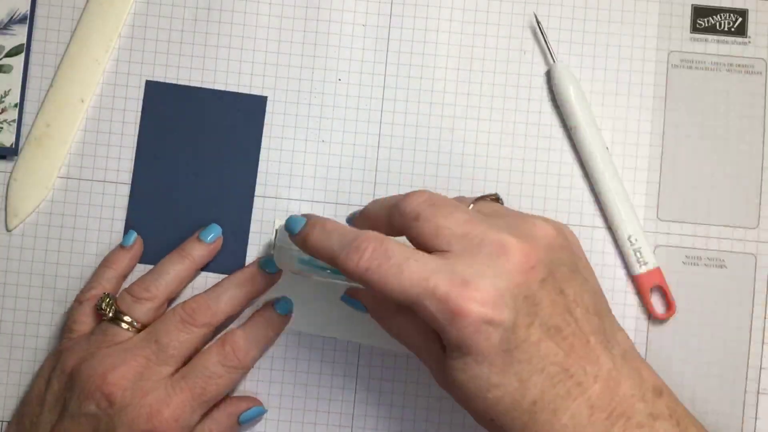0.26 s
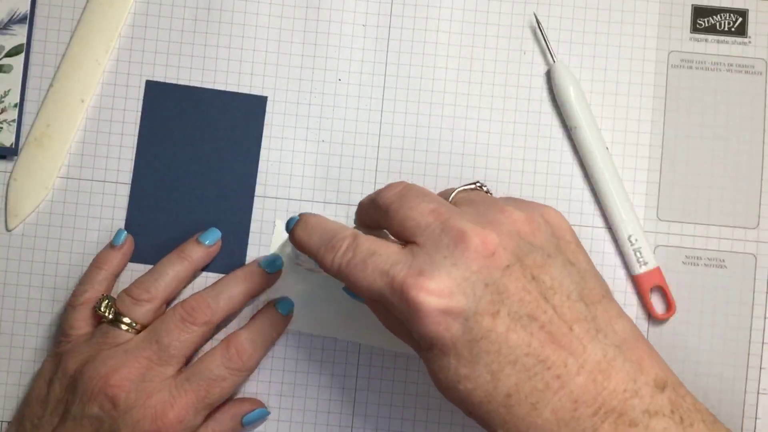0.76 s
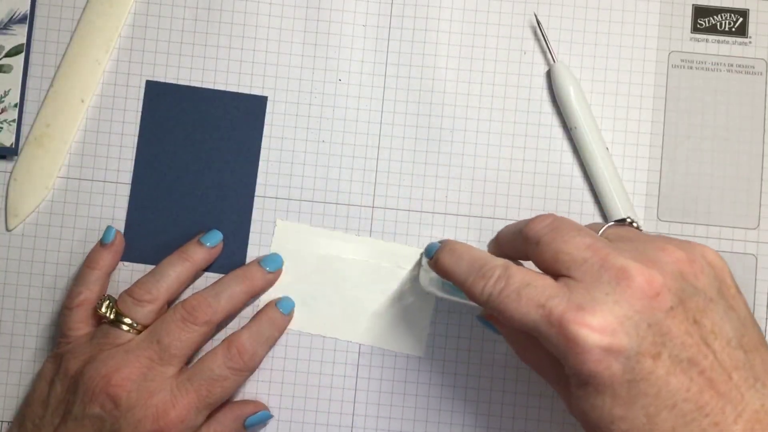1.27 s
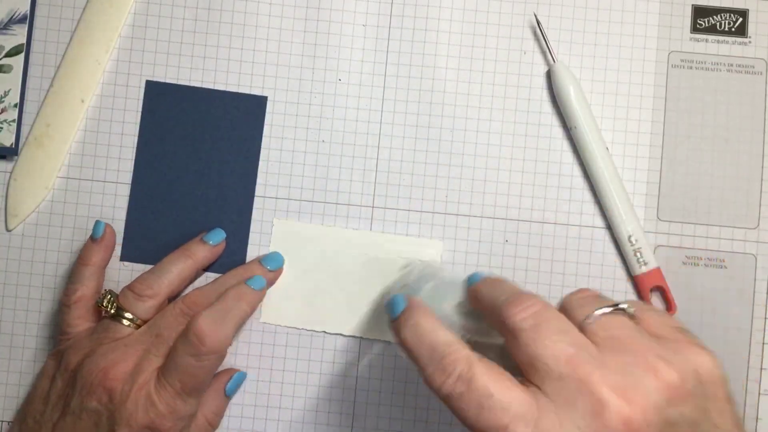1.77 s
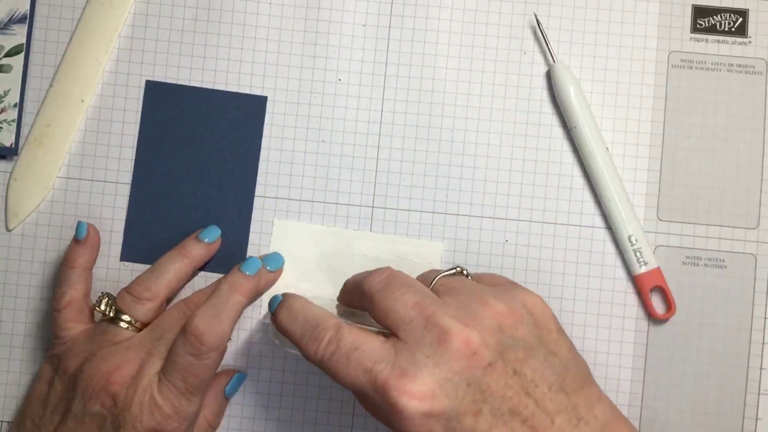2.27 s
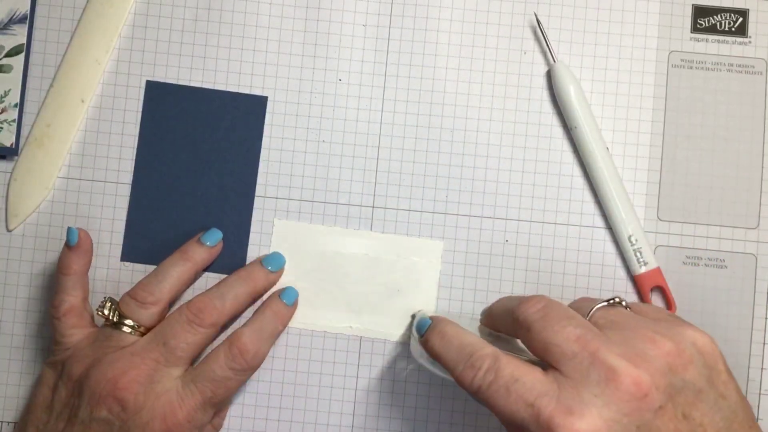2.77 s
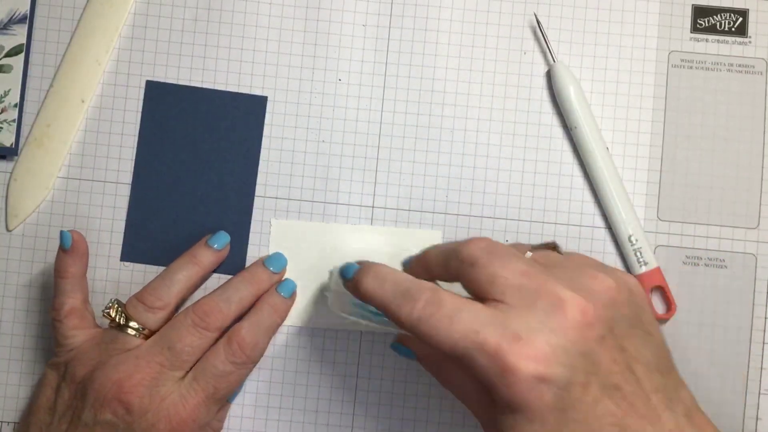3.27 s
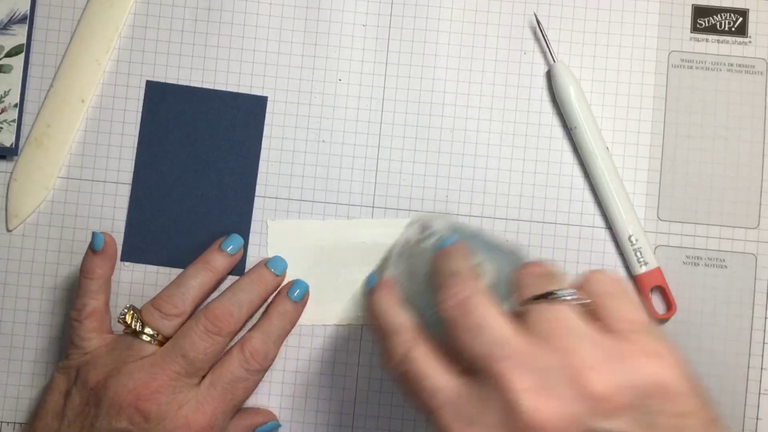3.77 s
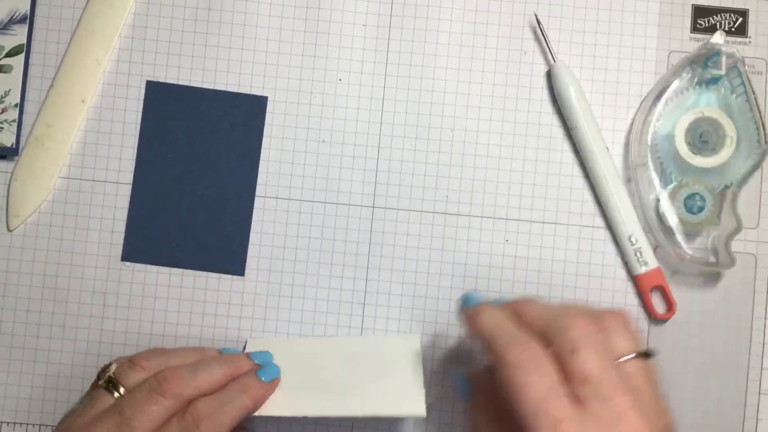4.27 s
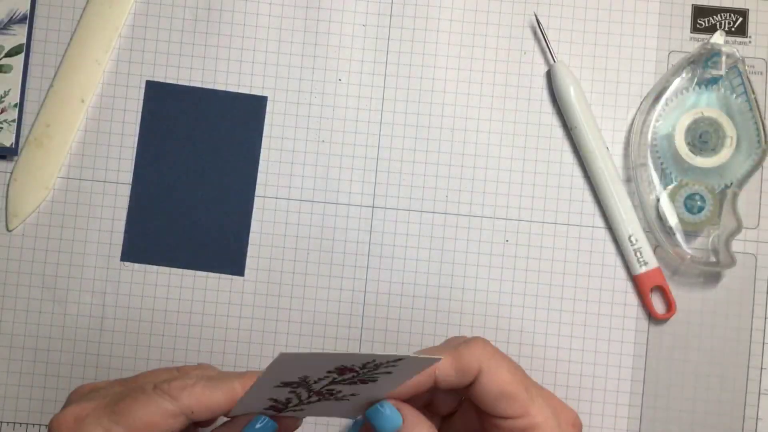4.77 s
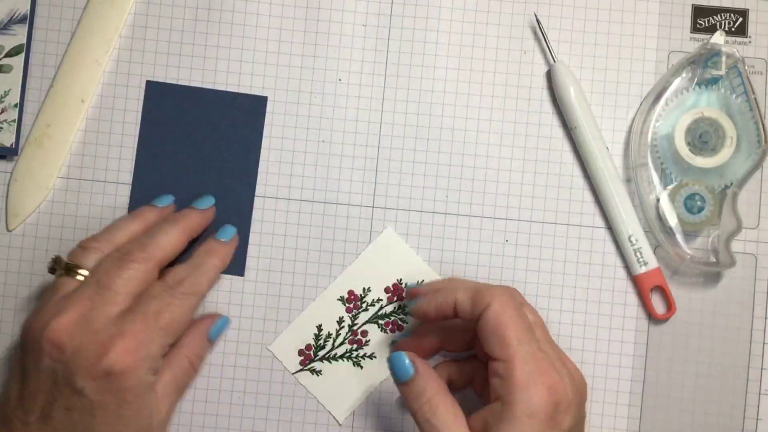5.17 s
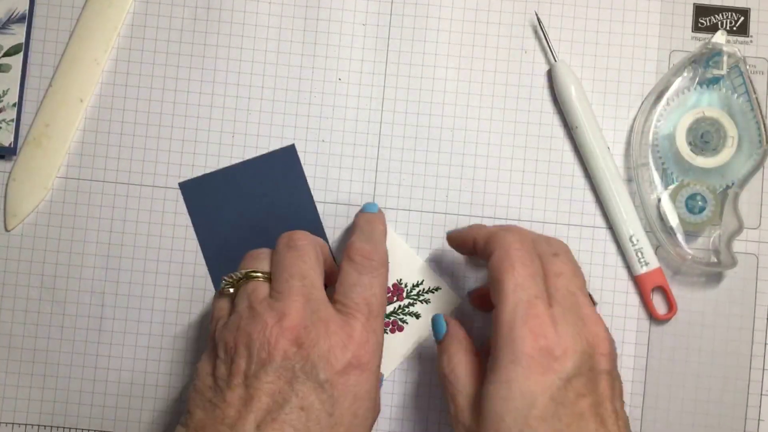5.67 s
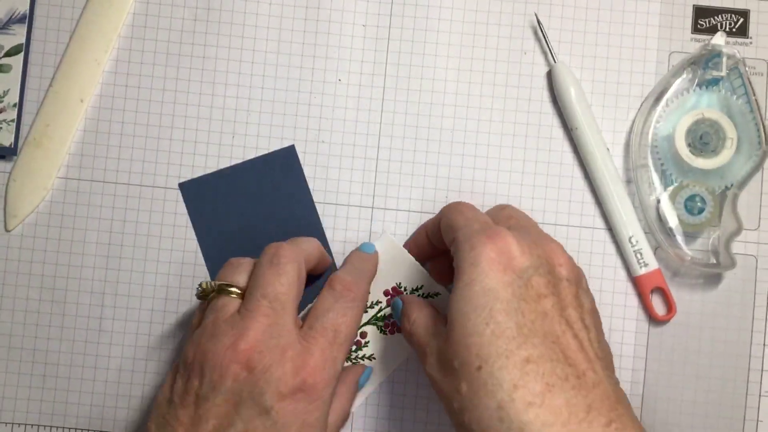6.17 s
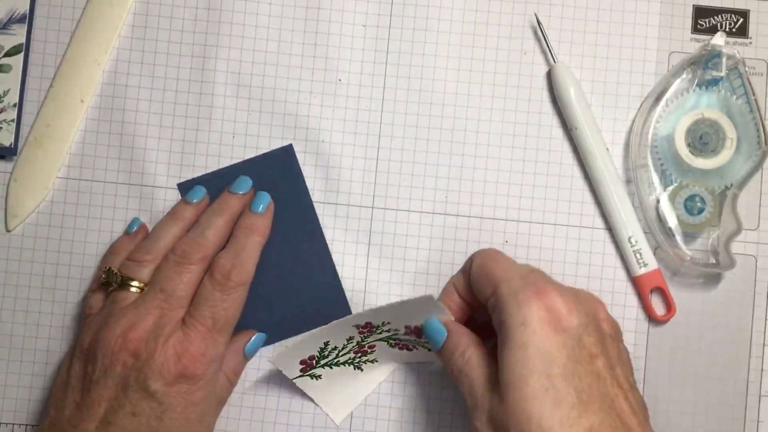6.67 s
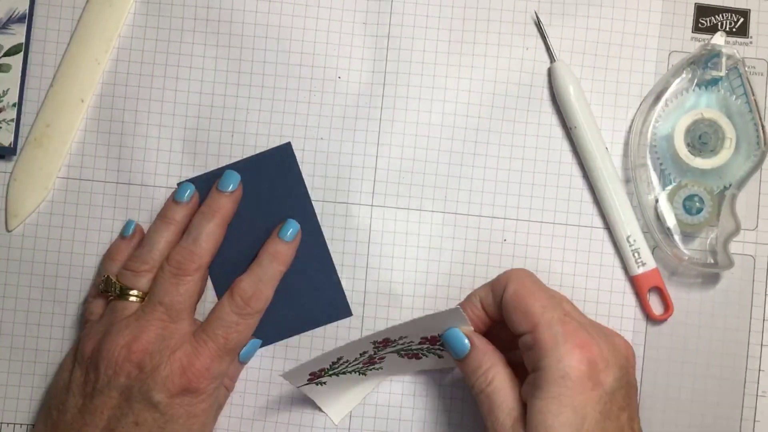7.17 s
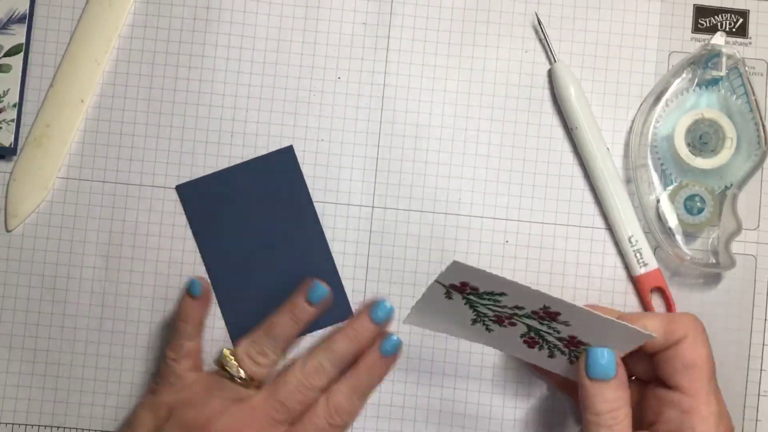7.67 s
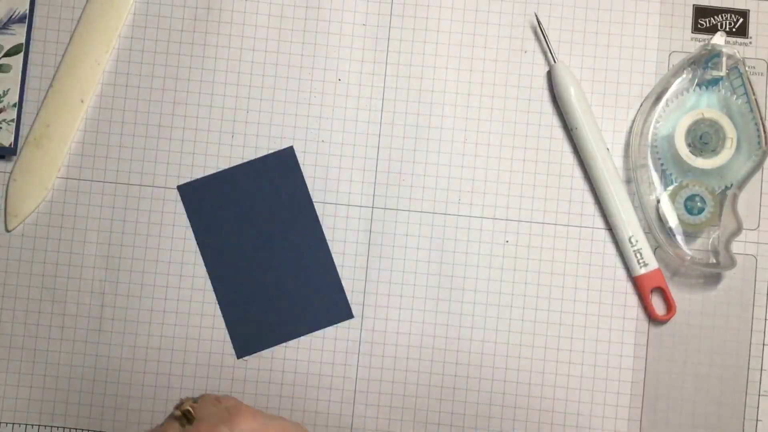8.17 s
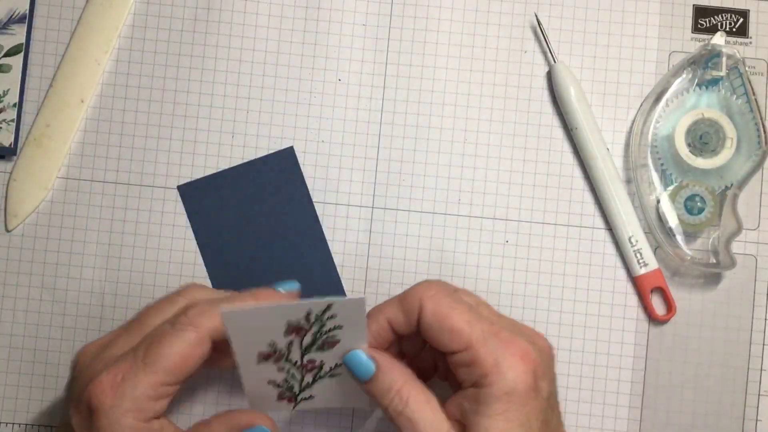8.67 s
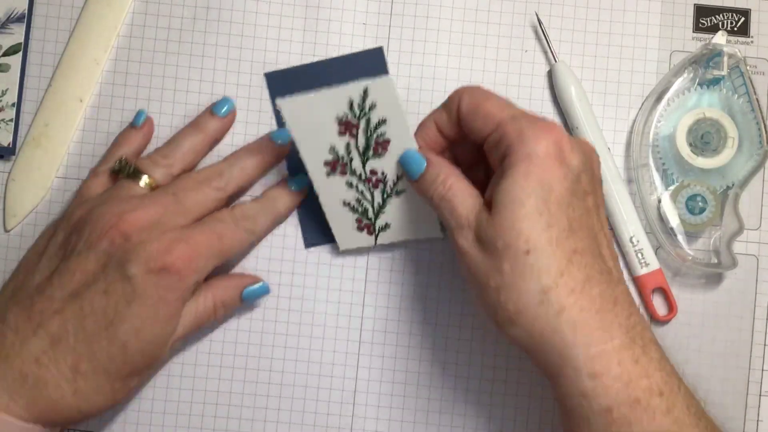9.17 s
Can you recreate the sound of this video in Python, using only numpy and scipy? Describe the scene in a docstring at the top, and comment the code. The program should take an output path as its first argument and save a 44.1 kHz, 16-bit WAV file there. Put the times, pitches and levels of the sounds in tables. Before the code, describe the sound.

Close up at a craft table in a quiet small room, a plastic tape runner is drawn over card with soft rasps, low table rubs and scattered clicks. A fast ratchet burst and clacks follow as it is set aside. Then the card is picked up, brushed and flicked, with crisp snaps, the loudest past the middle, before quieter sliding. A faint engine revs far off behind gentle ventilation.

```python
"""An adhesive tape runner is drawn across card on a craft table and set down; the card is picked up, flicked and slid.
Shell and card: short noise contacts ring resonances, with table thud, treble tick and sizzle, and room echoes.
Roller, fingers and card on paper: random slips drive rasp, table rumble, crackle and hiss under stroke envelopes.
Behind: filtered noise and a thin whine as room tone; gliding near-sines as a short hoot and a far engine."""
import sys
import numpy as np
from scipy import signal
from scipy.fft import rfft, irfft, next_fast_len
from scipy.io import wavfile

SR = 44100
rng = np.random.default_rng(int(sys.argv[2]) if len(sys.argv) > 2 else 0)


def inscribe(sig):
    """Save sig as 16-bit PCM at rate SR to the path in sys.argv[1].

    A 1-D sig is mono; a 2-D sig holds one channel per row.
    Samples are clipped to [-1, 1] before scaling.
    """
    pcm = np.round(np.clip(np.atleast_2d(sig).T, -1, 1) * 32767)
    wavfile.write(sys.argv[1], SR, pcm.astype(np.int16))


N = 416304


def from_db(db):
    """Amplitude factor of a level in dB."""
    return 10 ** (np.asarray(db) / 20)


def rms_one(x):
    """Scales to RMS 1."""
    return x / np.sqrt(np.mean(x ** 2) + 1e-20)


def peak_one(x):
    """Scales to peak 1."""
    return x / np.max(np.abs(x))


def in_time(rows):
    """Columns of a curve, one value per sample."""
    s, *columns = np.transpose(rows)
    return [np.interp(np.arange(N) / SR, s, c) for c in columns]


def coloured(x, spectrum):
    """Gives x a smooth spectrum of (frequency [Hz], gain [dB]) points."""
    hz, gain_db = np.transpose(spectrum)
    size = next_fast_len(len(x))
    log_hz = np.log(np.arange(size // 2 + 1) * SR / size + 1)
    gain = from_db(np.interp(log_hz, np.log(hz), gain_db))
    return irfft(rfft(x, size) * gain, size)[:len(x)]


def high_pass(x, hz):
    """Fourth-order high-pass."""
    return signal.sosfilt(signal.butter(4, hz, "high", fs=SR, output="sos"), x)


def low_pass(x, hz, order):
    """Butterworth low-pass."""
    return signal.sosfilt(signal.butter(order, hz, fs=SR, output="sos"), x)


def drift(rate_hz):
    """Slow random wander of RMS 1: noise through a double pole."""
    r = np.exp(-2 * np.pi * rate_hz / SR)
    noise = rng.standard_normal(N + SR)
    return rms_one(signal.lfilter([1], [1, -2 * r, r * r], noise)[SR:])


def resonate(x, hz, width_hz):
    """A resonance with gain 1 on top."""
    r = np.exp(-np.pi * width_hz / SR)
    poles = [1, -2 * r * np.cos(2 * np.pi * hz / SR), r * r]
    return signal.lfilter([(1 - r * r) / 2, 0, (r * r - 1) / 2], poles, x)


def body(x, modes, extra_db=0):
    """Resonances in parallel, signs alternating."""
    gains = from_db(np.array(modes)[:, 2] + extra_db) * (-1) ** np.arange(len(modes))
    return sum(g * resonate(x, hz, width_hz) for g, (hz, width_hz, db) in zip(gains, modes))


def glide(rows, second_db):
    """A near-sine on a pitch curve plus its faint octave, faded in and out at the curve's ends."""
    hz, level_db = in_time(rows)
    s = np.arange(N) / SR
    fade_in = np.clip((s - rows[0][0]) / 0.04, 0, 1)
    fade_out = np.clip((rows[-1][0] - s) / 0.025 + 1, 0, 1)
    phase = 2 * np.pi * np.cumsum(hz) / SR
    tone = np.sin(phase) + from_db(second_db) * np.sin(2 * phase)
    return np.sqrt(2) * fade_in * fade_out * from_db(level_db) * tone


# ventilation spectrum: (frequency [Hz], gain [dB])
AIR_SPECTRUM = [(18, -74), (30, -34.5), (157, -1.5), (194, 5), (404, -15), (569, -16.5), (1070, -16),
                (1350, -12.5), (1500, -15.5), (2750, -21), (4910, -35), (6550, -47), (7670, -52),
                (13300, -49), (16000, -33.5)]
AIR_RMS_DB, WHINE_HZ, WHINE_DB = -61, 1372, -76  # whine: centre pitch and level


def room_tone():
    """Soft ventilation noise with a lumpy bass, and a thin sine whine wandering in pitch and level."""
    air = rng.standard_normal(N) * from_db(1.0 * drift(6.5))
    air = rms_one(coloured(air, AIR_SPECTRUM))
    whine_hz = WHINE_HZ + 2 * drift(3)
    whine = np.sqrt(2) * np.sin(2 * np.pi * np.cumsum(whine_hz) / SR) * from_db(3 * drift(2))
    return from_db(AIR_RMS_DB) * air + from_db(WHINE_DB) * whine


# strokes of roller, fingers and card on paper: (strongest time [s], swell [s], fade [s], rasp level [dB],
# table rumble level [dB], rumble pitch [Hz], fine hiss level [dB], rasp pitch [Hz])
STROKE_ROWS = [(.05, .2, 0.18, -64, -70, 382, -78, 2670), (.33, 0.23, 0.18, -56.5, -54.5, 435, -62.5, 2430),
               (.53, 0.16, 0.08, -64.5, -59, 365, -75, 2390),
               (.775, 0.022, 0.18, -55, -51.5, 524, -72, 1890), (.87, 0.12, 0.16, -58, -52, 460, -75, 3750),
               (1.3, 0.42, 0.35, -63.5, -65, 556, -66, 2070), (1.84, .08, .12, -59, -62.5, 626, -71, 3000),
               (1.95, 0.072, 0.032, -56, -73, 623, -63, 3400),
               (2.4, 0.012, 0.04, -62, -47.5, 490, -67, 2200),
               (2.49, 0.028, 0.055, -52.5, -49, 400, -78, 3680), (2.7, 0.2, 0.18, -61, -59, 550, -64, 2220),
               (2.83, .15, 0.15, -57, -59, 570, -59, 2100), (3.2, 0.15, 0.04, -61.5, -64, 583, -78, 2880),
               (3.32, 0.032, 0.044, -55, -56, 714, -51.5, 2600),
               (3.71, .06, 0.17, -52, -64, 483, -58.5, 3160),
               (3.83, 0.062, 0.051, -65, -58.5, 566, -65, 2900),
               (4.05, 0.11, 0.15, -63.5, -60.5, 644, -62, 3200),
               (4.28, 0.11, 0.24, -58.5, -77, 420, -65.5, 3350),
               (4.41, 0.11, 0.093, -61.5, -61, 620, -65, 2300),
               (4.6, 0.023, 0.13, -59, -60, 700, -63, 2900),
               (4.73, 0.1, 0.089, -49.5, -46.5, 895, -59.5, 2410),
               (4.85, 0.18, 0.48, -60, -61, 340, -74, 2750),
               (5.23, 0.043, 0.038, -56.5, -57.5, 705, -55.5, 3130),
               (5.592, .1, 0.15, -58.5, -64.5, 1040, -54, 3730),
               (5.869, 0.13, 0.11, -58.5, -55.5, 980, -57.5, 3330),
               (6.039, 0.077, 0.092, -73, -46, 725, -72, 2000),
               (6.13, 0.059, .04, -62.5, -51, 605, -68.5, 2200),
               (6.5, 0.13, 0.11, -56.5, -62, 706, -61, 3400), (6.63, .04, 0.044, -59, -65, 450, -74, 3400),
               (6.71, 0.099, 0.12, -60, -64, 480, -57.5, 3300),
               (6.85, 0.11, 0.35, -55, -61.5, 690, -59.5, 3120),
               (7.13, 0.11, 0.14, -58.5, -65, 750, -60, 3200), (7.39, 0.12, 0.22, -57, -63, 690, -57, 2600),
               (7.61, 0.21, 0.11, -49.5, -70, 800, -52, 2850),
               (7.88, 0.033, 0.059, -51.5, -70, 781, -59, 2500),
               (7.935, 0.04, .05, -54.5, -56.5, 740, -59, 2380),
               (8.13, 0.35, .08, -59.5, -71, 850, -53.5, 4000),
               (8.44, 0.026, 0.036, -58, -57, 750, -61.5, 2600),
               (8.52, .025, 0.028, -47.5, -49.5, 738, -50.5, 2400),
               (8.62, 0.09, 0.036, -60.5, -63.5, 420, -66, 3230),
               (8.83, 0.18, 0.28, -66.5, -70, 710, -70.5, 2280),
               (9.41, 0.24, 0.23, -57, -66, 1007, -51, 3600)]
# hands resting on the paper: (rasp level [dB], rumble level [dB], rumble pitch [Hz], hiss level [dB],
# rasp pitch [Hz])
RESTING_HANDS = (-69.5, -76.5, 548, -74.5, 2692)
STROKE_EDGE_DB, STROKE_ROUNDNESS = 15.5, 1.63  # drop one swell or fade away; 1 pointed, 2 rounded


def strokes():
    """Each stroke swells and fades by one rule; powers add, and power-weighted means set the pitches."""
    s = np.arange(0, N + 64, 64) / SR
    at_s, swell_s, fade_s, *columns = np.transpose(STROKE_ROWS)[:, :, None]
    away = np.where(s < at_s, (at_s - s) / swell_s, (s - at_s) / fade_s)
    power_shape = from_db(-2 * STROKE_EDGE_DB * np.minimum(away, 9) ** STROKE_ROUNDNESS)
    shapes = np.vstack([power_shape, np.ones_like(s)])  # resting hands never fade
    columns = [np.append(c, r)[:, None] for c, r in zip(columns, RESTING_HANDS)]
    rasp_db, rumble_db, rumble_hz, hiss_db, rasp_hz = columns
    rasp, rumble, hiss = [shapes * from_db(2 * db) for db in (rasp_db, rumble_db, hiss_db)]
    pitches = [(p * hz).sum(0) / p.sum(0) for p, hz in ((rasp, rasp_hz), (rumble, rumble_hz))]
    gains = [np.sqrt(p.sum(0)) for p in (rasp, rumble, hiss)]
    return [np.interp(np.arange(N) / SR, s, c) for c in gains + pitches]


def grains(per_s, spread_db):
    """Fibres catch and slip at random, with uneven strength and either sign."""
    sizes = from_db(spread_db * np.minimum(rng.exponential(1, N), 5)) * rng.choice([-1, 1], N)
    return sizes * (rng.random(N) < per_s / SR)


# table top under the mat: (frequency [Hz], width [Hz], gain [dB])
TABLE_MODES = [(340, 84, 10.5), (437.6, 110, 2.5), (553, 110, 2.5), (685, 195, -1.5), (925, 330, -4.5)]


def table_rumble(catches, pitch_hz):
    """Slips shake the table top; the place pressed favours the modes near one pitch."""
    bumps = (catches + 0.31 * rng.standard_normal(N)) * from_db(2.5 * drift(30))
    rumble, power = 0, 0
    for hz, width_hz, db in TABLE_MODES:
        gain = from_db(db - 19.4 * np.abs(np.log2(hz / pitch_hz)))
        rumble = rumble + gain * rms_one(resonate(resonate(bumps, hz, 4.8 * width_hz), hz, width_hz))
        power = power + gain ** 2
    return rumble / np.sqrt(power)


RASP_FOCUS_DB_PER_OCTAVE = 8


def rasping(slips, modes, pitch_hz):
    """Parallel modes, those near the stroke's pitch favoured, at an even level."""
    rings, power = 0, 0
    for k, (hz, width_hz, db) in enumerate(modes):
        gain = from_db(db - RASP_FOCUS_DB_PER_OCTAVE * np.abs(np.log2(hz / pitch_hz)))
        rings = rings + gain * (-1) ** k * resonate(slips, hz, width_hz)
        power = power + gain ** 2 * width_hz
    return rms_one(rings / np.sqrt(power))


# roller on card: (frequency [Hz], width [Hz], gain [dB])
ROLLER_MODES = [(1880, 350, 3.5), (2680, 630, 4), (3370, 1660, 1), (6040, 2400, -9.5)]
# card on mat and fingers: (frequency [Hz], width [Hz], gain [dB])
PAPER_MODES = [(1980, 890, 1), (2730, 440, 5), (3260, 650, 3.5), (4220, 1100, -1.5), (5700, 850, -5.5)]
RUNNER_DOWN_S, RASP_TOP_HZ = 4.15, 7000
CRACKLES_PER_S, CRACKLE_DB = 130, -7  # level re rasp


def paper_rasp(catches, pitch_hz):
    """Slips ring the runner's shell until it is laid aside, then card; adhesive and fibres let go in crackles."""
    slips = catches + 0.5 * rng.standard_normal(N)
    runner_in_hand = np.arange(N) < RUNNER_DOWN_S * SR
    rasp = np.where(runner_in_hand, rasping(slips, ROLLER_MODES, pitch_hz), rasping(slips, PAPER_MODES, pitch_hz))
    rasp = low_pass(high_pass(rasp, 1100), RASP_TOP_HZ, order=2)
    crackle = body(grains(CRACKLES_PER_S, spread_db=1.5) + 1e-18, PAPER_MODES)
    return rms_one(rasp) + from_db(CRACKLE_DB) * rms_one(high_pass(crackle, 1200))


# air at the contact: (frequency [Hz], gain [dB])
HISS_SPECTRUM = [(4500, 5), (6400, 2.5), (7600, -3.5), (9000, -4), (11000, -7.5), (13500, -5), (15800, -8)]


def fine_hiss(catches):
    """The finest slips shake the air at the contact."""
    hiss = coloured(catches + 0.63 * rng.standard_normal(N), HISS_SPECTRUM)
    return rms_one(high_pass(hiss, 5100))


def rubbing():
    """One uneven stream of slips drives table top, card and air."""
    rasp_gain, rumble_gain, hiss_gain, rasp_hz, rumble_hz = strokes()
    catches = grains(1800 * from_db(4 * drift(40)), spread_db=3.3) * from_db(2.5 * drift(60))
    rumble = rumble_gain * table_rumble(catches, rumble_hz)
    rasp = rasp_gain * paper_rasp(catches, rasp_hz)
    return rumble + rasp + hiss_gain * fine_hiss(catches)


# hoot: (time [s], pitch [Hz], level [dB])
HOOT_CURVE = [(0.21, 456, -53), (0.292, 448, -56.5), (0.32, 481, -54), (0.344, 442, -55), (0.4, 483, -65)]


def hoot():
    """A short hollow near-sine as the runner comes down."""
    return glide(HOOT_CURVE, second_db=-30)


# treble resonances of a tick: (frequency [Hz], width [Hz], gain [dB])
TICK_MODES = [(6540, 780, 3.5), (7250, 780, -6), (8330, 210, -4.5)]
TABLE_HZ = 207.5  # deepest mode of the table top
IMPACT, IMPACT_S = 6, 0.0007  # first hard touch: strength re the crackle, delay


def clicks(events, modes, snap_t60_s, contact_t60_s, thud_width_hz, focus_db, spread_db):
    """A brief crackling contact rings the object, thuds on the table, ticks and sizzles in the treble."""
    size = 4096
    out = np.zeros(N + size)
    s = np.arange(size) / SR
    # sharp snap plus a weaker, longer crackle
    decay = from_db(-60 * s / snap_t60_s) + 0.23 * from_db(-60 * s / contact_t60_s)
    shape = (1 - np.exp(-s / 0.00041)) * decay
    impact = IMPACT * (np.arange(size) == round(IMPACT_S * SR))
    mode_hz = np.array(modes)[:, 0]
    for at_s, peak_db, bright_hz, thud_db, thud_hz, tick_db, sizzle_db in events:
        contact = rng.standard_normal(size) * shape + impact + 1e-18
        # the place struck favours modes near one pitch [dB per octave]
        focus = -focus_db * np.abs(np.log2(mode_hz / bright_hz))
        strength_db = spread_db * rng.standard_normal(len(modes)) + focus
        # a small, light object radiates no bass of its own
        ring = high_pass(body(contact, modes, strength_db), 985)
        crack = resonate(contact, bright_hz, 2500)
        struck = peak_one(ring) + 0.29 * peak_one(crack)
        thud = resonate(resonate(contact, thud_hz, 4.9 * thud_width_hz), thud_hz, thud_width_hz)
        deep = resonate(resonate(contact, TABLE_HZ, 140), TABLE_HZ, 130)
        thud = peak_one(thud) + 0.29 * peak_one(deep)
        tick = high_pass(body(contact, TICK_MODES), 6030)
        sizzle = high_pass(contact, 6970)
        at = round(at_s * SR)
        for part, db in ((struck, 0), (thud, thud_db), (tick, tick_db), (sizzle, sizzle_db)):
            out[at:at + size] += from_db(peak_db + db) * peak_one(part)
    return out[:N]


# ratchet runs in the tape spool: (first time [s], teeth [count], gap [s], peak level [dB], brightest [Hz])
RATCHET_RUNS = [(3.715, 5, 0.01, -35, 3580), (3.8048, 2, 0.012, -39, 2830), (3.9386, 2, .008, -44.5, 4010),
                (3.9647, 3, 0.015, -40, 2120)]
# each tooth: (thud re peak [dB], thud pitch [Hz], tick re peak [dB], sizzle re peak [dB])
TOOTH_PARTS = (-18.5, 522, -24, -26)


def teeth():
    """Evenly spaced ratchet teeth, one click row each."""
    return [(s + k * gap_s, db, hz, *TOOTH_PARTS)
            for s, count, gap_s, db, hz in RATCHET_RUNS for k in range(round(count))]


# clicks of the runner shell: (time [s], peak level [dB], brightest [Hz], thud re peak [dB], thud pitch [Hz],
# tick re peak [dB], sizzle re peak [dB])
RUNNER_CLICKS = [(0.2975, -27.5, 2080, -3, 1070, -38, -26), (0.7462, -37, 1900, -6, 533, 1.5, -24),
                 (0.7699, -31.5, 2700, -6.5, 524, -9, -31), (0.8689, -41, 3300, -10, 525, -7, -10),
                 (0.8954, -20, 1640, -5, 490, -14, -9), (1.0023, -31.5, 1970, -14, 940, -10, 7.5),
                 (1.7594, -36.5, 3980, -41, 1280, -12, -20), (1.8295, -32, 3430, -15, 1320, -23, -33),
                 (1.8497, -33.5, 1850, -17, 520, -16, -35), (1.938, -37, 3700, -33, 1170, -18, -31),
                 (2.0029, -43.5, 2990, -30, 1260, 6.5, 12), (2.0974, -46, 4100, -25, 371, -17, 14.5),
                 (2.388, -41.5, 3060, -2.5, 460, -5, -27), (2.4743, -31, 3430, -15, 525, -35, -25),
                 (2.5244, -45.5, 2610, 2, 556, -12, -19), (2.5506, -35, 3370, -23, 360, -15, -7),
                 (2.5648, -51, 3450, -16, 498, -6, 20), (2.668, -51, 3000, -7, 550, 0, 13),
                 (2.6978, -47.5, 2130, 8, 570, -7, -20), (2.835, -37.5, 2180, -3.5, 585, -1, -2),
                 (2.9297, -43.5, 1980, -24, 1230, -15, 15), (3.2505, -35.5, 3700, -12.5, 590, -12, -31),
                 (3.271, -37.5, 1830, -7.5, 1250, -14, -24), (3.3112, -40.5, 3850, -27, 507, 1, -17),
                 (3.6422, -27, 4140, -10, 660, -0.5, -22), (3.6616, -22.5, 3230, -13, 518, -7.5, -28),
                 (4.0218, -36, 3990, -22, 1270, -10, -18), (4.0411, -21.5, 3730, -25, 1260, -31, -39),
                 (4.0616, -43.5, 3240, -9, 840, 7.5, -8), (4.0823, -40.5, 2160, -5.5, 530, -11, -28)]
# plastic shell: (frequency [Hz], width [Hz], gain [dB])
SHELL_RESONANCES = [(1360, 830, -8), (1980, 125, 3), (2180, 150, -1.5), (2670, 410, -4), (3370, 670, 0.5),
                    (3700, 480, 4), (4300, 780, -5)]


def runner_shell():
    """The plastic shell rattles and its spool ratchet clicks."""
    return clicks(RUNNER_CLICKS + teeth(), SHELL_RESONANCES, snap_t60_s=0.019, contact_t60_s=0.022,
                  thud_width_hz=84, focus_db=6.5, spread_db=2.0)


ROOM_T60_S, ROOM_DB, WALL_CUT_HZ, ECHO_RISE_S = 0.094, -12, 2200, 0.0064


def room(x):
    """Dense echoes from cluttered table and walls: a dull part dies first, a bright part lasts longer."""
    s = np.arange(SR // 2) / SR
    bright, dull = rng.standard_normal((2, len(s)))
    dull = rms_one(low_pass(dull, WALL_CUT_HZ, order=1))
    bright_tail = 1.16 * bright * from_db(-60 * s / (1.9 * ROOM_T60_S))
    dull_tail = dull * from_db(-60 * s / ROOM_T60_S)
    echoes = (bright_tail + dull_tail) * np.clip(s / ECHO_RISE_S, 0, 1)
    return signal.fftconvolve(x, echoes / np.sqrt(np.sum(echoes ** 2)))[:N]


# snaps of the card: (time [s], peak level [dB], brightest [Hz], thud re peak [dB], thud pitch [Hz],
# tick re peak [dB], sizzle re peak [dB])
CARD_SNAPS = [(4.346, -22.5, 3170, -3, 1104, -11, -24), (4.4403, -39, 2280, -24, 557, -2.5, -34),
              (4.565, -38, 3100, -13.5, 557, -4, -30), (4.6325, -27, 2770, -17, 1240, -22, -21),
              (4.6533, -22, 2780, -14.5, 760, -15, -19), (4.6643, -21.5, 2830, -13, 780, -10, -31),
              (4.7132, -26, 2490, -17, 1140, -14, -2), (4.7299, -28, 2960, -3, 1030, -17, 2),
              (5.015, -42, 3500, -10.5, 800, -7, -10), (5.22, -31.5, 2670, -16, 830, -6, 0),
              (5.243, -36, 4200, -17, 800, -13, -12), (5.3462, -21.5, 1980, -3.5, 647, -5.5, 5),
              (6.1304, -52.5, 1730, 10.5, 663, -23, -27), (6.395, -45, 3400, -6, 700, -9, -8),
              (6.4592, -39.5, 3300, -28, 619, -5.5, -22), (6.5101, -37.5, 3300, -36, 600, -19, -24),
              (6.5435, -30.5, 3290, -16.5, 703, -31, -30), (6.663, -30, 3080, -16, 778, -2, 9),
              (6.7161, -33, 3380, -30, 431, -13, -25), (6.8448, -37, 3010, -34, 794, -17, -1),
              (6.9172, -13, 3730, -21.5, 910, -33, -42), (7.1167, -33, 3500, -27, 676, -15, -12),
              (7.1312, -25.5, 3600, -25, 557, -21, -2), (7.3921, -32, 2370, -7, 1210, -5.5, -14),
              (7.4255, -13, 2650, -25, 1290, -17, -46), (7.4354, -36.5, 2584, 0.5, 660, -23, -38),
              (7.4634, -29, 2760, -12, 1290, -27, -26), (7.5383, -36, 4100, -28, 633, -28, 6),
              (7.5879, -25, 3477, -34, 960, -24, -5), (7.5926, -6, 3230, -33, 650, -8, 2),
              (7.6075, -19, 4480, -10.5, 1050, -23, -49.5), (8.422, -39.5, 3880, -9.5, 846, -11, -28),
              (8.5052, -32, 3000, -20, 650, -7, 4), (8.5144, -30, 4040, -13, 685, -18, -24),
              (8.525, -31, 2030, -11.5, 970, -18, -44), (8.59, -40, 3300, -16, 900, -18, -20),
              (8.7505, -43.5, 3440, 6, 1043, -16, -19), (8.953, -50, 4000, -15, 600, -4, 5),
              (9.135, -49, 3980, -14, 600, -6, -7)]
# card sheet: (frequency [Hz], width [Hz], gain [dB])
CARD_RESONANCES = [(1150, 620, -9.5), (1794, 324, 3), (1865, 850, -0.5), (2600, 460, 1.5), (2760, 730, 2),
                   (3650, 690, -3.5), (4460, 650, -1.5), (4630, 1740, -5), (5930, 810, -6.5)]


def card_snaps():
    """The flicked card snaps, ringing broad sheet resonances."""
    return clicks(CARD_SNAPS, CARD_RESONANCES, snap_t60_s=0.02, contact_t60_s=0.059,
                  thud_width_hz=188, focus_db=12.5, spread_db=4.0)


# far engine through a gear change: (time [s], firing pitch [Hz], level before the microphone [dB])
ENGINE_CURVE = [(4.4, 86.5, -73), (4.85, 93, -73), (5.05, 100.4, -64.5), (6.0, 111.1, -71.5),
                (6.45, 123, -66), (6.74, 129.4, -74), (6.91, 132.8, -60), (7.47, 144, -53.5),
                (7.77, 149.5, -68.5), (7.96, 146.6, -65.5), (8.08, 139, -54), (8.18, 122.7, -73),
                (8.3, 114, -67), (8.88, 107.7, -70.5), (9.44, 114, -68)]


def engine():
    """A far engine revs: a near-sine at the firing rate rises, drops and recovers slightly."""
    return glide(ENGINE_CURVE, second_db=-20.5)


def scene():
    """Struck objects with echoes, rubbing, tones and room tone, as one channel."""
    struck = runner_shell() + card_snaps()
    echoed = struck + from_db(ROOM_DB) * room(struck)
    return (room_tone() + rubbing() + hoot() + echoed + engine())[None]


CUTOFF_HZ = 16600


def record(dry):
    """The microphone drops the deep bass; the top is cut."""
    thin = signal.sosfilt(signal.butter(2, 110, "high", fs=SR, output="sos"), dry)
    return signal.sosfilt(signal.cheby2(14, 60, CUTOFF_HZ, fs=SR, output="sos"), thin)


dry = scene()
out = record(dry)
inscribe(out)
```